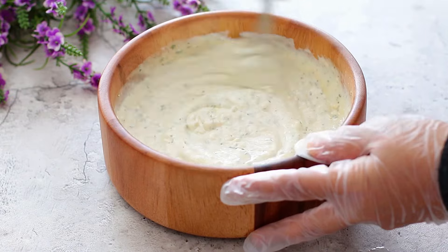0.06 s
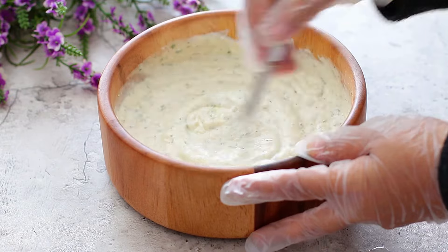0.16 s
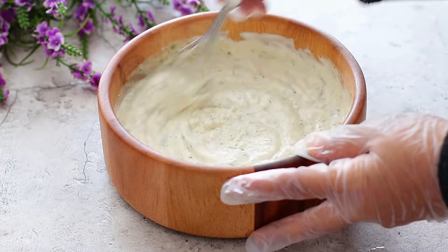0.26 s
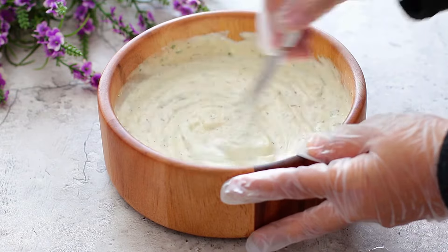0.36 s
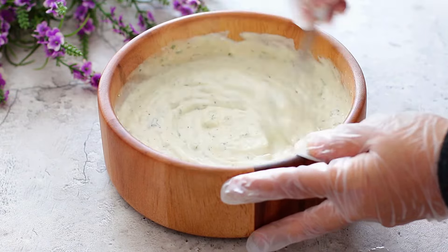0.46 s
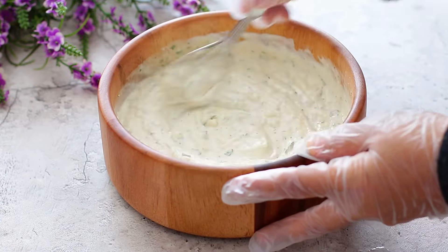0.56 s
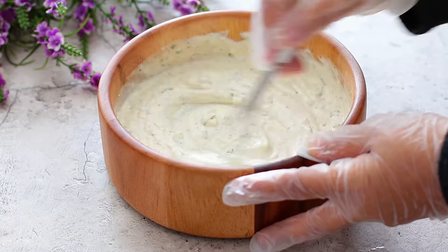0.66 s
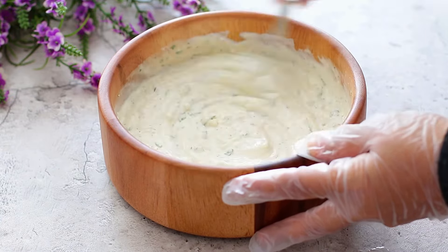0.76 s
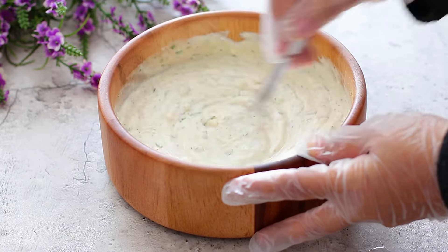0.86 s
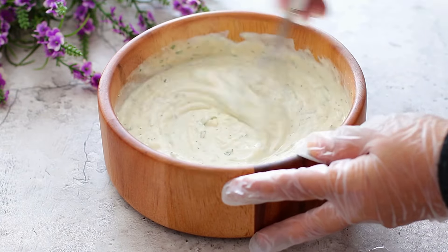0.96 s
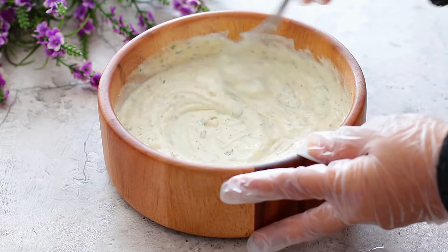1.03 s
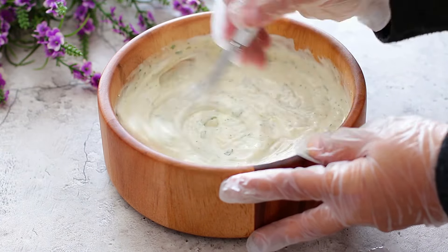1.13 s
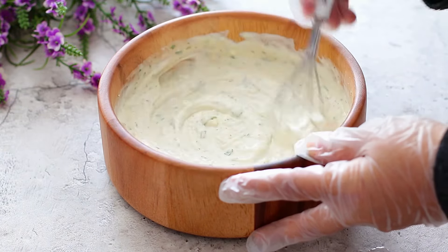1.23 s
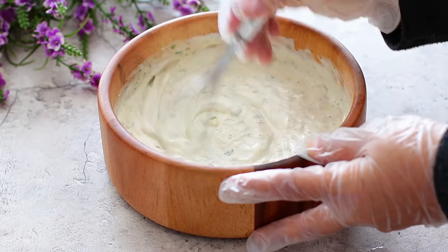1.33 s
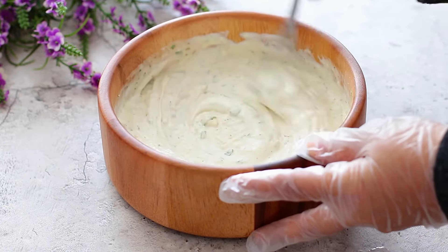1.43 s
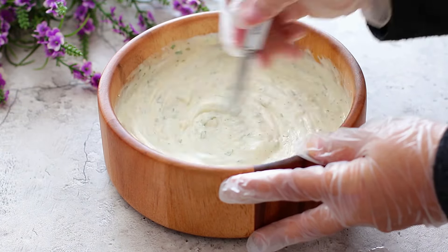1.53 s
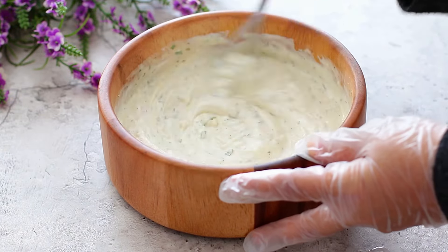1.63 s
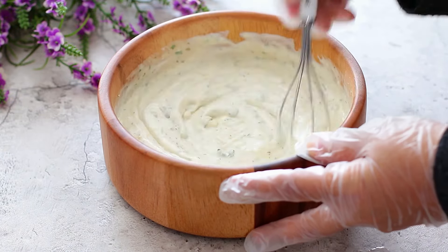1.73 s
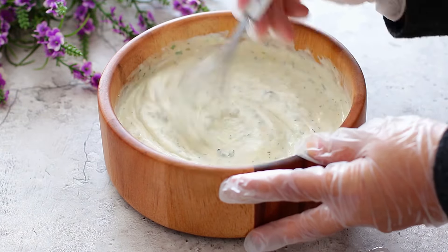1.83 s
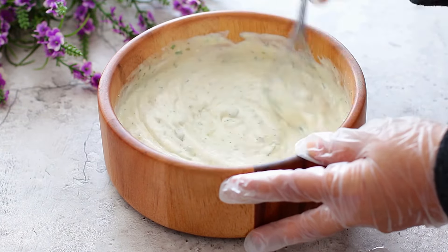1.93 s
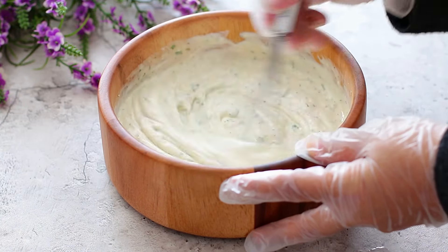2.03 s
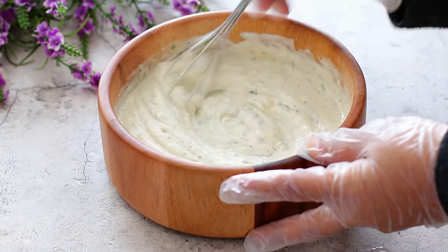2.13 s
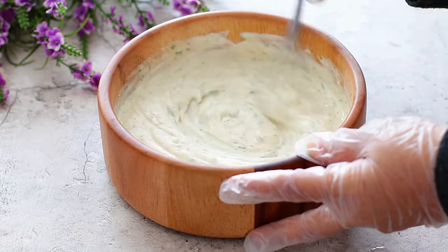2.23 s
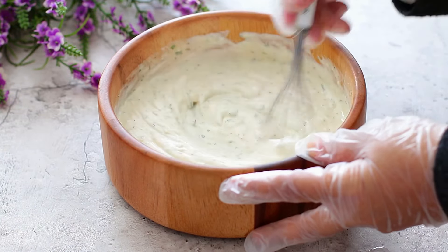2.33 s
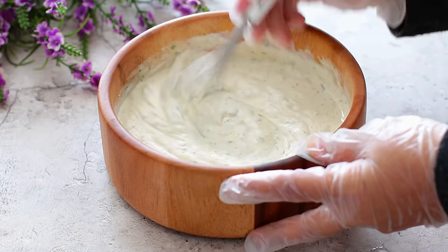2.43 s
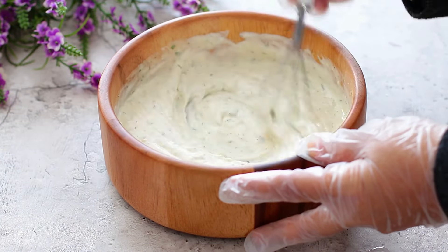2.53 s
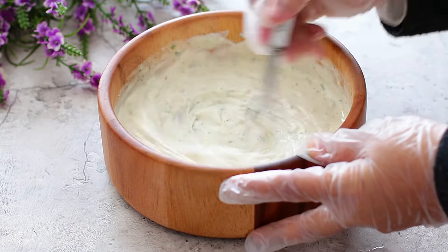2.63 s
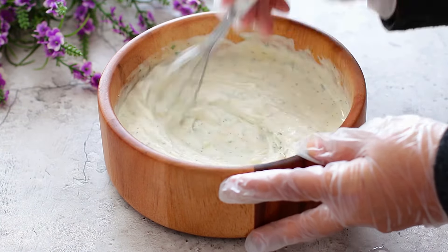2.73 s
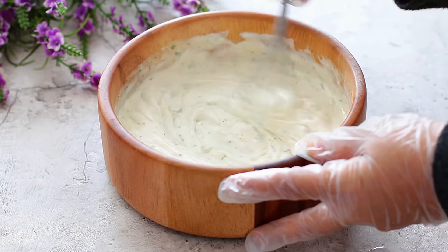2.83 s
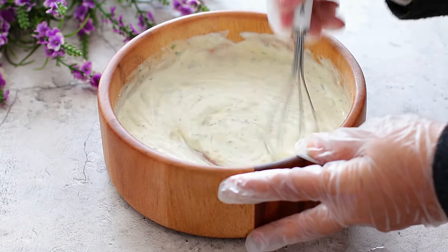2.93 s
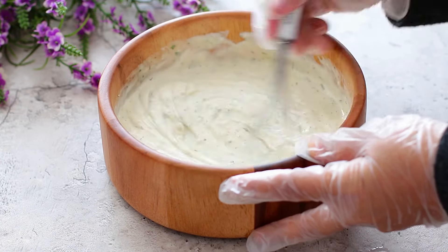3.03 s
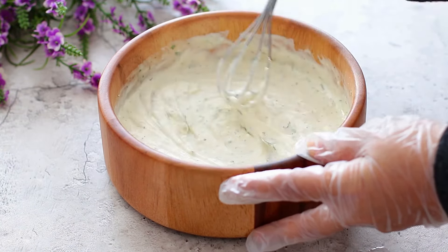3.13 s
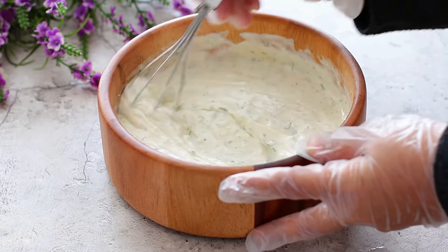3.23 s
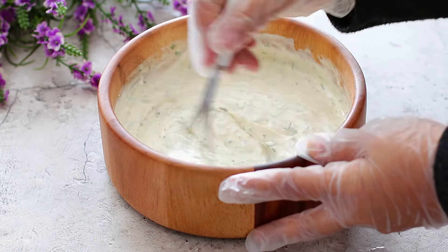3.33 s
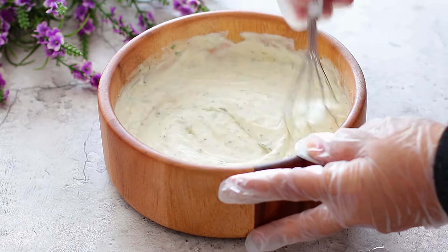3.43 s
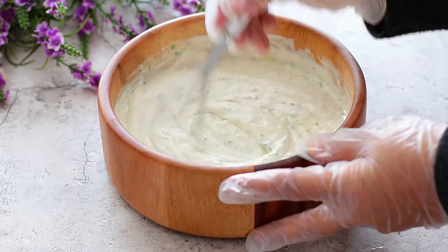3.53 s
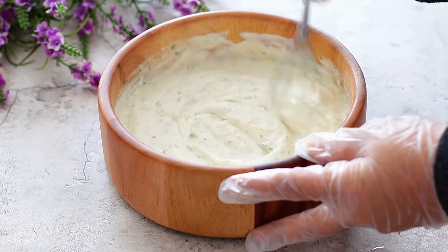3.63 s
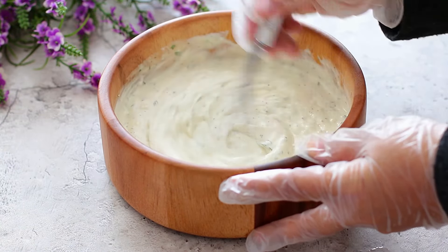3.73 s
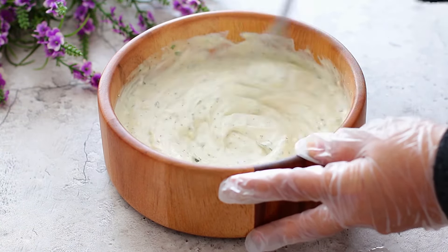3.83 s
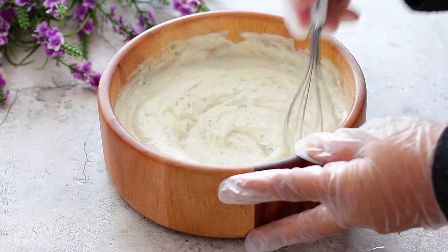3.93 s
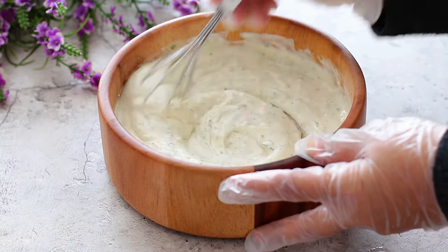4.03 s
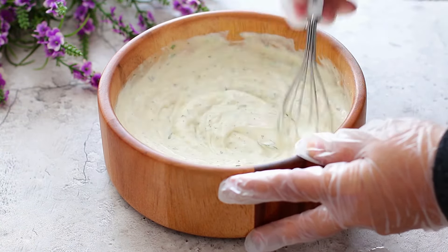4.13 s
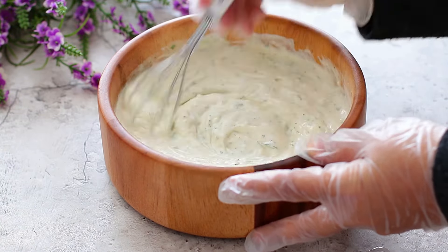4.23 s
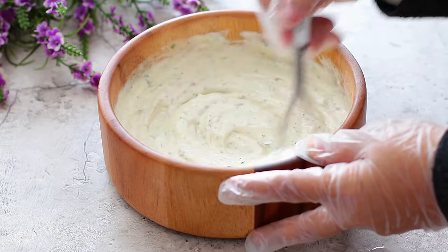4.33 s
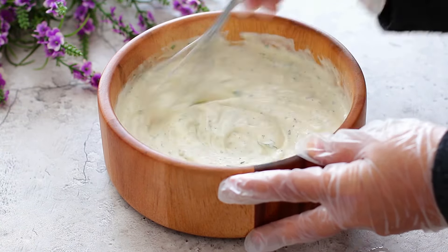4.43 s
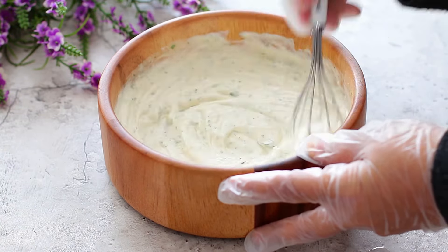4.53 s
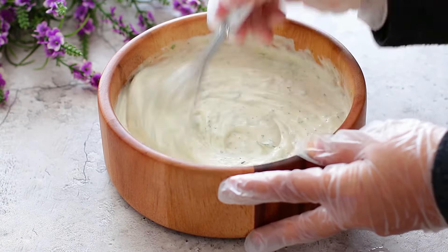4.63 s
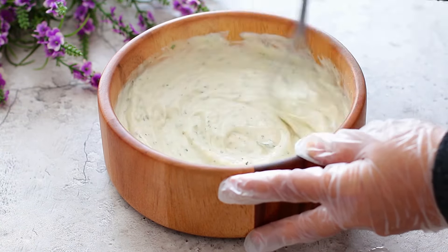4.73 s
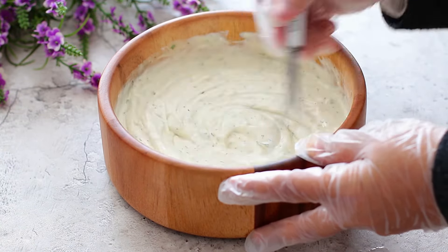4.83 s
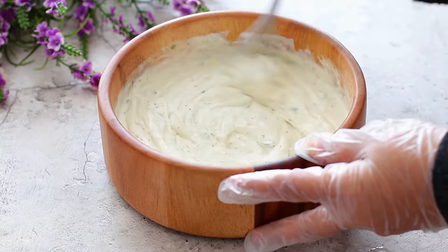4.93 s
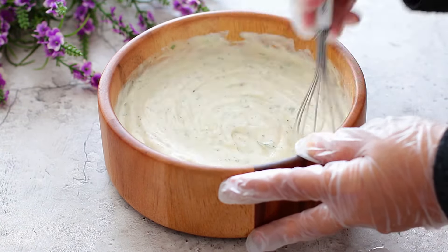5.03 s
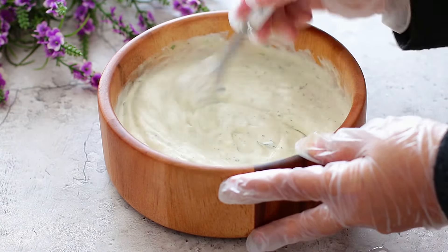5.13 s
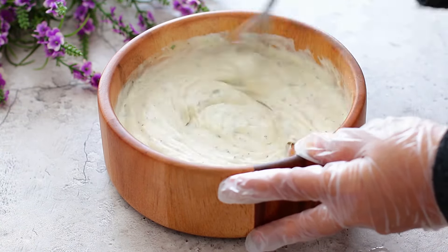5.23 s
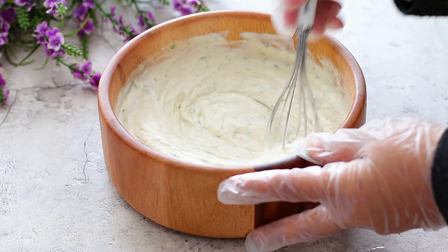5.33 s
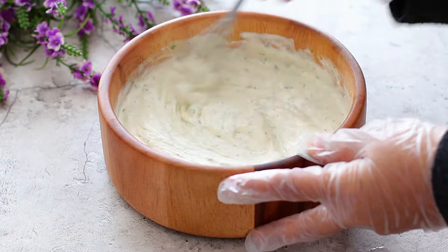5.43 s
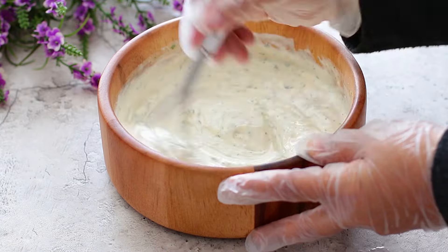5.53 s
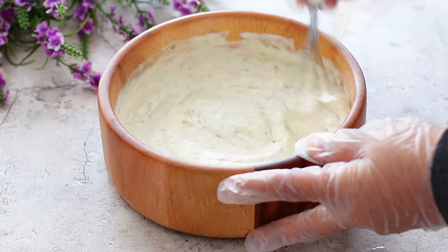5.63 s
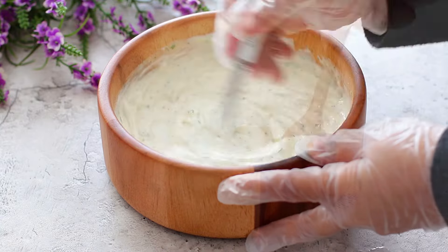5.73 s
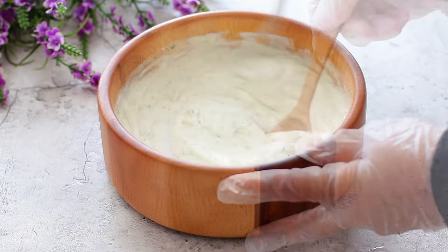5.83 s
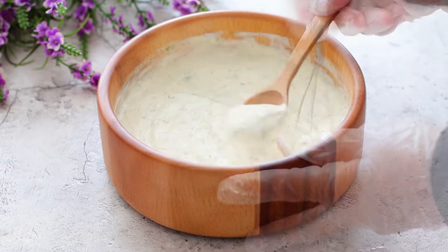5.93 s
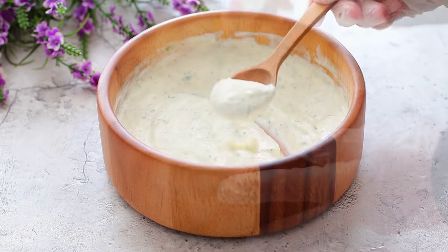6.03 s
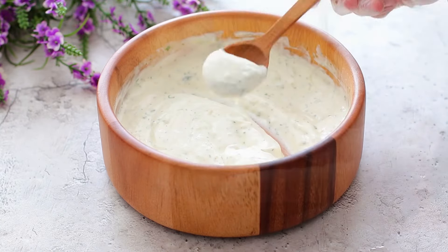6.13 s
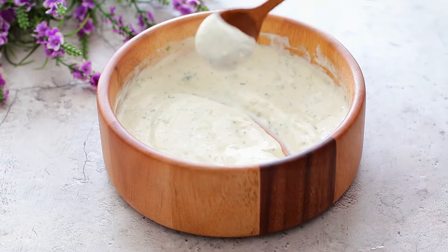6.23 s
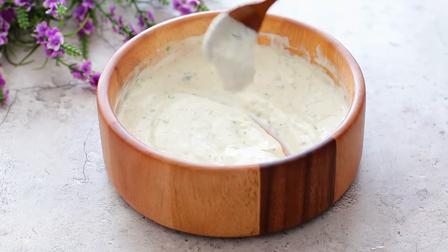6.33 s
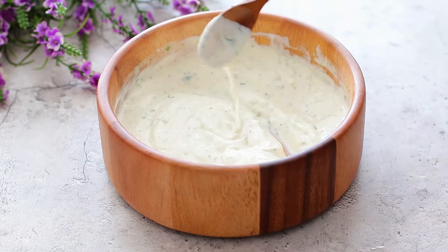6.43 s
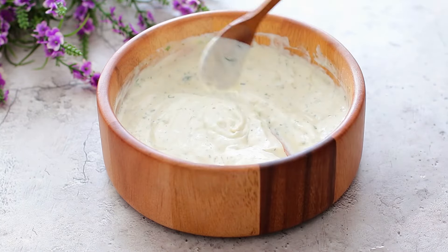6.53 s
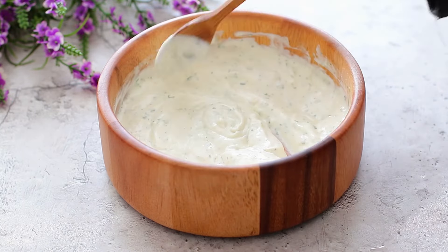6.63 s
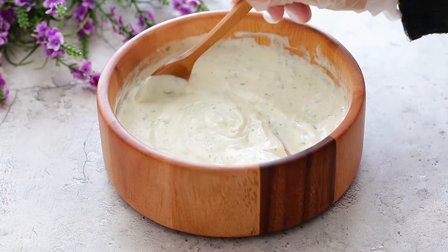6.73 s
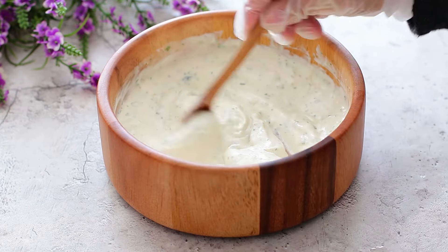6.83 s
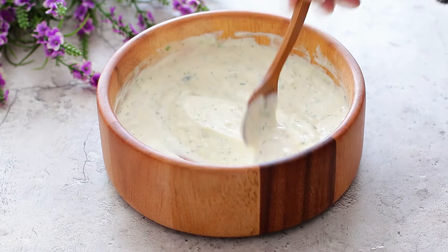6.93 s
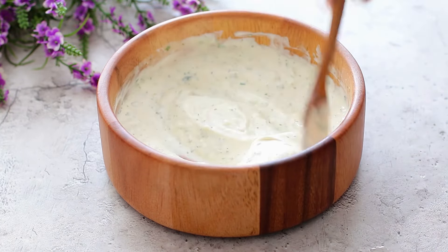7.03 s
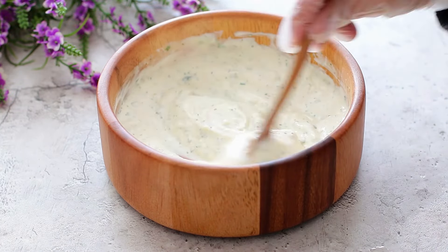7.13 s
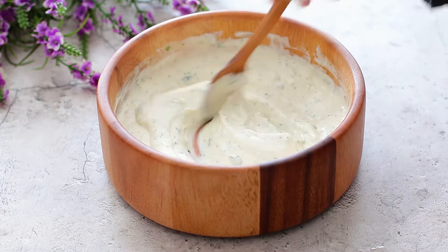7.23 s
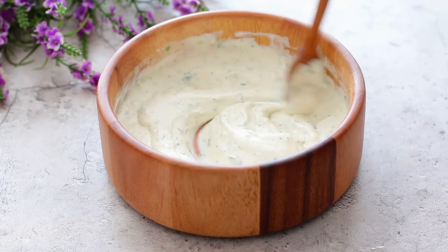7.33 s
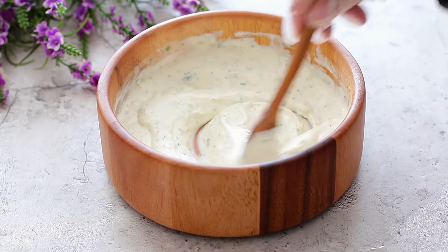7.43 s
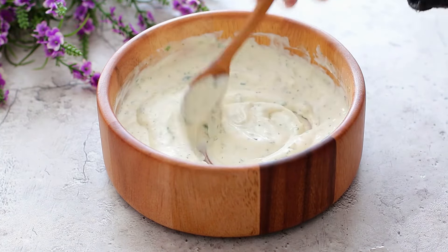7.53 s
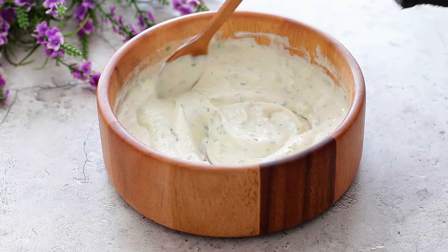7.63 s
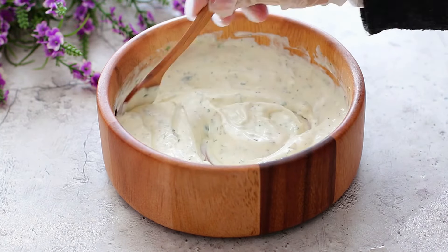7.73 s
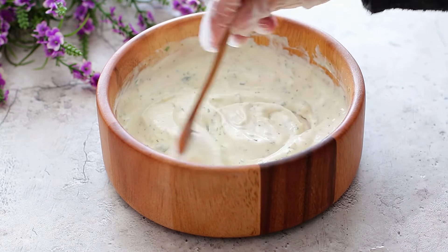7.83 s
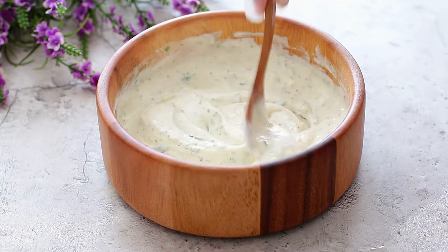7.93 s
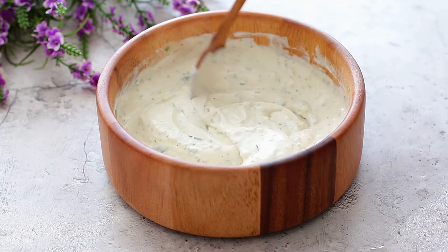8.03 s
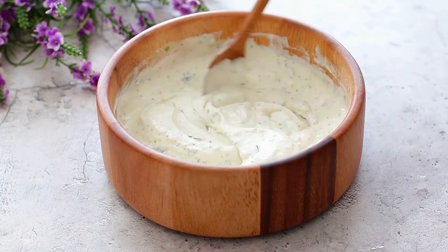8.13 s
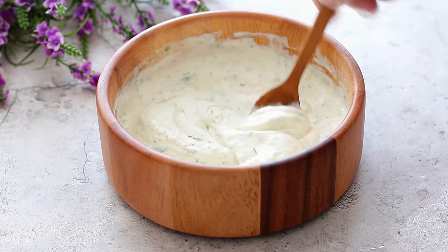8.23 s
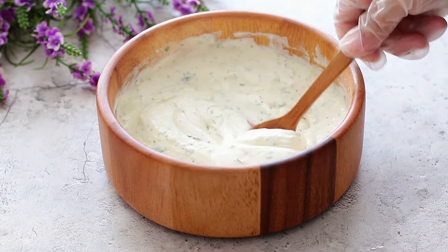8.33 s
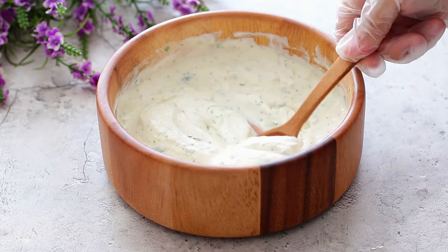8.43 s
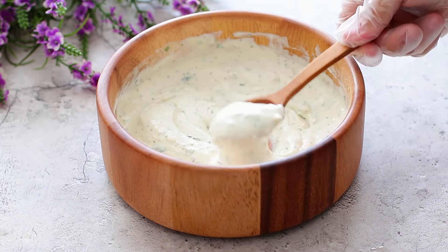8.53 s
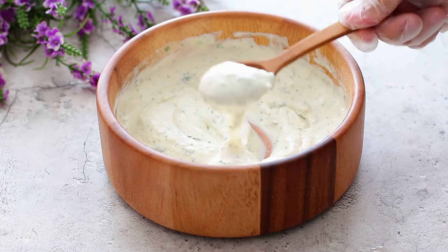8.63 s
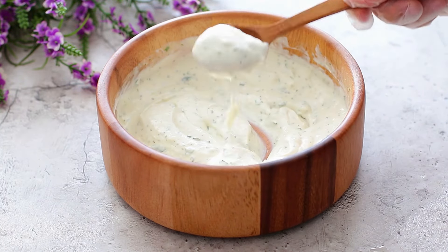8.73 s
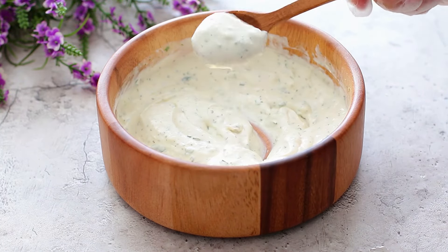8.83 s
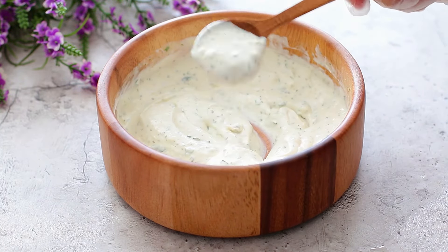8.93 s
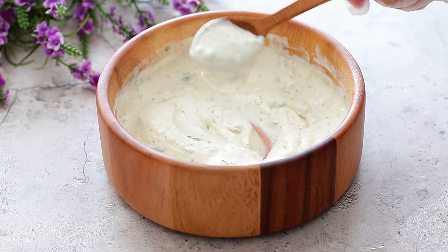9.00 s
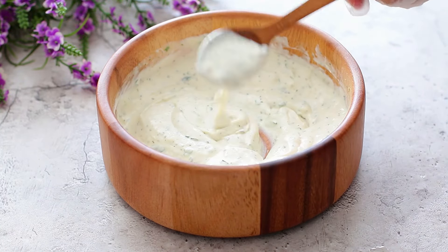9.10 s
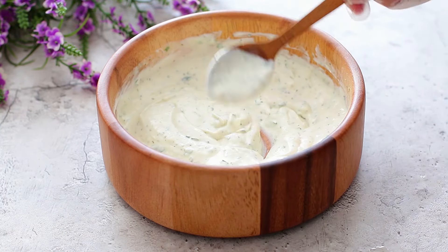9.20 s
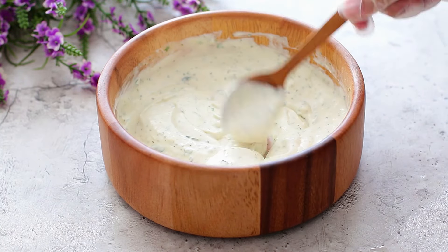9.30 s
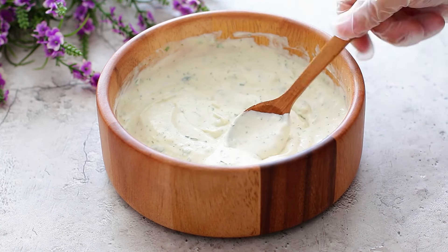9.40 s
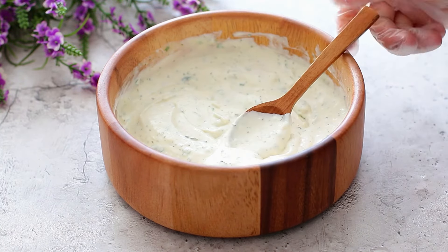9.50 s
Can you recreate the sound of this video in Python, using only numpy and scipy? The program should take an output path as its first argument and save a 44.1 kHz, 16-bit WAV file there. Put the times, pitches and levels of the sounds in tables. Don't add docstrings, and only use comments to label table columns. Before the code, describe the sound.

Close stereo pickup of a wire whisk beating thick sauce in a wooden bowl. Rhythmic bright rasps, about six a second, ride over a light drag on the bottom, with soft sauce slaps and sharp wire taps. After six seconds it stops; a wooden spoon knocks, skids and rubs sparsely, with faint drips at the end. Quiet kitchen air and a low appliance hum lie behind.

```python
import sys
import numpy as np
from scipy import signal
from scipy.fft import rfft, irfft, next_fast_len
from scipy.io import wavfile
from scipy.ndimage import uniform_filter1d

SR = 44100
rng = np.random.default_rng(int(sys.argv[2]) if len(sys.argv) > 2 else 0)


def invert_db(x):
    u = np.asarray(x, float) / 20
    return 10 ** u


def dump_mix(stems):
    frames = np.atleast_2d(stems).T
    limited = np.clip(frames, -1, 1)
    pcm = np.round(limited * 32767).astype(np.int16)
    wavfile.write(sys.argv[1], SR, pcm)


N = 421596

# peak_s, peak_db, rise_ms, fall_ms, low_wall_db
BEATS = [(.437, -41.5, 9.7, 25, -4.5), (.6, -37, 16, 11, -2.5), (0.751, -37, 4, 30, 1),
         (.954, -40.5, 17, 13, -2), (1.017, -39, 6.3, 7.9, -4.5), (1.19, -44.5, 35, 20, 5),
         (1.391, -39.5, 37, 28, -1.5), (1.59, -35, 35, 14.6, -0.5), (1.757, -32, 19.3, 20.7, -1.5),
         (1.923, -30.5, 15.6, 14.3, -1.5), (2.081, -31.5, 21, 16, -0.5), (2.228, -29.5, 18.5, 16.5, -1.5),
         (2.376, -31.5, 15, 17, 0.5), (2.52, -32, 21, 15, 1.5), (2.677, -29, 15, 15, -3),
         (2.8, -36.5, 6.5, 10, 5), (2.821, -27.5, 14.7, 7.8, -2), (2.961, -26.5, 12.7, 12.8, -7),
         (3.091, -29.5, 15.5, 13.3, 1), (3.598, -37.5, 11, 44, -3), (3.787, -33.5, 20, 23, -1),
         (3.942, -32.5, 15, 32, -3), (4.712, -35.5, 24, 27, -2), (4.882, -30, 11.4, 16.7, 0.5),
         (5.048, -34, 21, 23.4, -0.5), (5.205, -29, 13.8, 20.3, -2), (5.36, -32.5, 19, 12.7, 0),
         (5.797, -40, 33, 21, -3), (5.955, -36, 12.4, 20, -3.5), (6.128, -46.5, 24, 25, -5)]
# peak_s, peak_db, rise_and_fall_ms, main_ring_hz
BRUSHES = [(.095, -42.5, 15, 3100), (0.271, -46, 16, 4100), (0.307, -45.5, 11, 4100),
           (.368, -39, 4.8, 4230), (0.523, -41, 7.9, 4260), (0.679, -40, 16, 4100), (.878, -50, 22, 4140),
           (1.15, -42.5, 7.6, 4000), (1.27, -55, 20, 4640), (1.64, -55, 10, 4500), (2.61, -47, 7.6, 2800),
           (2.919, -41, 7.6, 4100), (3.478, -41.5, 6.8, 4580), (4.188, -46.5, 13, 3200),
           (4.239, -47, 4.9, 4560), (4.384, -41.5, 16.5, 3360), (4.458, -41.5, 4.7, 2950),
           (4.52, -48.5, 34, 3900), (4.587, -44, 9, 4510), (4.643, -41, 4.56, 2830),
           (4.818, -50, 10.3, 4200), (5.144, -41, 4.9, 2780), (5.611, -41, 8.6, 3970),
           (5.666, -44.5, 6, 2890), (5.896, -45.5, 9.3, 2880), (6.165, -49, 7.4, 3760),
           (6.255, -48.5, 10, 1710), (6.306, -56.5, 26, 3840)]
# peak_s, peak_db, rise_ms, fall_ms, main_ring_hz
PRESSES = [(.15, -46, 4.3, 7.6, 1500), (1.546, -58, 25, 25, 2300), (3.282, -41.5, 8.8, 5.2, 1540),
           (3.355, -35, 22.4, 21, 1590), (3.38, -39.5, 37, 17, 3340), (3.391, -36, 42, 11, 4740),
           (4.086, -37.5, 9.1, 11.7, 1600), (4.291, -33, 5.2, 9.9, 1630), (4.766, -43, 8.1, 4.4, 2800),
           (5.531, -47, 28, 47, 1600), (5.761, -43.5, 16, 8.7, 2300)]
# pitch_hz, width_hz, level_db
WALL = [(593, 145, -18), (882, 78, -12), (2930, 820, -15.5), (5745, 440, -2), (6580, 1700, -6.5),
        (8370, 580, -2.5), (9070, 540, -6.5), (12280, 3100, -9)]
# pitch_hz, width_hz, level_db
WALL_LOW = [(1526, 216, -3), (1939, 220, 0.5)]
# pitch_hz, width_hz, level_db
BOTTOM = [(1050, 460, -10), (1600, 190, -5), (2300, 550, 2.5), (3100, 490, 0.5), (4220, 710, 1.5),
          (5700, 830, -2.5), (7030, 1570, 3.5), (8000, 5650, 1), (9820, 1240, 3), (11500, 4200, -8.5)]
# pitch_hz, left_minus_right_db
WHISK_SIDE = [(60, 1), (130, -4.5), (290, 3.5), (640, 10), (1410, 1.5), (3100, 3.5), (6820, 2),
              (15000, 5.5)]
# time_s, level_db
EFFORT = [(0, -44), (.37, -49.5), (1.0, -54), (1.41, -46.5), (1.8, -51.5), (2.93, -47.5), (3.3, -56.5),
          (3.75, -44.5), (3.9, -48), (4.82, -45), (5.19, -48), (5.4, -50.5), (5.7, -52.5), (5.78, -49.5),
          (6.0, -53.5), (6.3, -61.5), (6.4, -72), (6.5, -89)]
# start_s, length_s
LIFTS = [
    (0.381, 0.013),
    (1.033, 0.078),
    (3.147, 0.12),
    (5.45, 0.019),
]
# start_s, peak_db, rattle_s, left_minus_right_db, thud_db
TAPS = [(0.142, -30, 0.021, -0.5, -79), (0.187, -36, 0.0061, -4, -65), (0.406, -31, 0.0025, 2, -36),
        (0.896, -32, 0.0048, 0, -62), (1.114, -36.5, 0.0059, -1, -44), (1.132, -31, 0.0073, -4, -64.5),
        (1.33, -34, .004, 2, -60), (1.512, -27.5, 0.0097, -0.5, -55), (1.898, -39, 0.011, 3.5, -65),
        (2.02, -28, 0.011, 0, -49), (2.315, -36, .004, 2, -62), (2.463, -14.5, 0.0074, 0.5, -52),
        (3.063, -24, 0.002, -4, -52), (3.241, -22, 0.0036, 2, -38), (3.2727, -17, 0.003, -6.5, -44),
        (3.321, -23, 0.0031, -4, -54.5), (3.906, -31, 0.0016, -16, -64), (4.047, -23.5, 0.0075, -6.5, -42),
        (4.2662, -17, 0.0077, -5.5, -59.5), (4.536, -40, .004, 2, -55), (5.293, -22.5, 0.011, -1, -53),
        (5.5014, -17, 0.0056, -3.5, -41), (5.61, -26.5, 0.0098, 2, -48), (5.737, -28.5, 0.008, 0, -66),
        (5.77, -34, 0.0048, 0, -50), (6.143, -30.5, 0.0047, 2, -66), (6.188, -39, 0.005, 5, -70),
        (6.225, -46, 0.0056, -4, -68)]
# peak_s, peak_db
SLAPS = [(.08, -78), (.23, -57), (0.408, -48.5), (.56, -53), (0.702, -51), (0.901, -53), (1.01, -57),
         (1.117, -51.5), (1.36, -61), (1.59, -67), (1.77, -64), (3.29, -55), (4.09, -69), (5.7, -59.5),
         (6.141, -69)]
# pitch_hz, width_hz, level_db
SLOSH = [(115.7, 6.4, -2.0), (179.0, 19.3, 5.0), (285.4, 41, -3), (428, 185, 1.5), (623, 120, -10.0), (854, 65, 0)]
# start_s, peak_db
BUMPS = [
    (3.268, -56),
    (3.312, -48.5),
    (5.544, -53),
]
# start_s, spot, peak_db, table_thump_db
KNOCKS = [(6.7506, "sauce", -43, -55), (7.152, "sauce", -48, -59), (7.261, "wall", -35.5, -64),
          (7.7246, "bottom", -23.5, -50), (7.89, "wall", -50, -62), (8.129, "wall", -19.5, -50),
          (8.168, "wall", -40, -70), (8.437, "bubble", -55, -73), (9.139, "drip", -48, -75),
          (9.322, "bubble", -52, -80), (9.509, "rim", -34, -61), (9.5173, "rim", -37.5, -70)]
SPOTS = {"sauce": [(600, 185, 3.5), (1080, 180, -4)], "bottom": [(594, 97, -2), (1030, 470, -4.5),
         (1600, 370, -3.5), (2480, 180, -4.5), (3970, 740, -15)], "wall": [(600, 340, -19.5),
         (1120, 230, -1.5), (1890, 340, -3.5), (2800, 400, -8), (5340, 1060, -12.5)],
         "rim": [(617, 38, -6.5), (1248, 49, 3), (1780, 440, -11), (3530, 490, -11.5), (5360, 810, -20)],
         "drip": [(1120, 76, 2), (1840, 360, -9), (3500, 980, -8)], "bubble": [(2600, 450, 3),
         (5200, 1100, 6)]}
# start_s, level_db, hold_s, release_db_per_s, flat_low_db
SKIDS = [
    (7.257, -52.5, 0.22, 293, 0),
    (7.731, -48.5, 0.0071, 295, 12),
    (7.886, -44.5, .012, 403, -1),
    (8.128, -49, 0.0053, 423, -3),
]
# start_s, level_db, hold_s, release_db_per_s, flat_low_db
RUBS = [
    (6.835, -44, .057, 795, -24),
    (7.483, -47, .03, 910, -23),
    (7.895, -49.5, 0.023, 600, 5),
    (8.18, -50, .011, 155, 3),
    (9.49, -55, 0.012, 230, 22),
]
# start_s, length_s, level_db, from_hz, to_hz
SINGS = [(7.262, .1, -53, 1650, 1430), (7.261, 0.24, -52, 1235, 1060), (7.292, .07, -57, 850, 800),
         (7.38, 0.15, -58.5, 654, 480), (7.501, 0.091, -52, 1820, 1800), (7.505, 0.057, -61, 1120, 1100),
         (7.89, 0.055, -51, 1130, 1080), (7.901, 0.065, -49, 1700, 1630), (8.128, .05, -54, 2800, 2600),
         (8.13, 0.056, -53, 2050, 1950), (8.162, 0.041, -46, 910, 800), (8.194, 0.16, -53, 1110, 1150),
         (8.2, .04, -61, 1900, 1850), (8.2, .04, -58, 5200, 5000), (8.213, .07, -63, 4000, 4100),
         (8.27, .06, -64, 3700, 3500), (7.495, 0.052, -47, 3000, 3100), (7.512, 0.034, -44.5, 4200, 4300),
         (7.258, .05, -53, 3000, 2920), (6.86, 0.067, -52, 1600, 1700)]
# pitch_hz, width_hz, level_db
BOWL = [(136, 41, -7.5), (329, 190, 0), (632, 130, -2.5), (790, 490, -14.5), (1133, 310, -0.5),
        (1820, 360, -9.5), (2500, 280, -10), (3000, 1170, -5.5), (4290, 740, -8.5), (5620, 1500, -8),
        (9300, 2300, -26.5)]
# pitch_hz, left_minus_right_db
SPOON_SIDE = [(60, 0.0), (150, -4), (380, 12), (950, 2.5), (2380, -1.5), (5980, 5), (15000, 3)]
# pitch_hz, t60_s
ROOM = [(100, 0.35), (1000, 0.38), (4000, 0.28), (12000, 0.18)]
# pitch_hz, density_db
AIR = [(12, -21), (20, -4.5), (96, -8), (146, -5), (574, -10), (642, -15), (976, -10), (1120, -18.5),
       (1220, -13.5), (12400, -19), (16000, -16)]
# pitch_hz, correlation
AIR_SAME = [(60, 0.14), (240, 0.13), (950, -0.38), (3770, 0.027), (15000, -0.096)]
# multiple, level_db
HUM = [(1, -100.5), (2, -78), (3, -80.5), (4, -84.5), (5, -85.5), (7, -86), (8, -100), (9, -82.5),
       (10, -88), (11, -95), (12, -80.5), (16, -89)]

BEAT_HZ, LOW_LEAD_MS = 3980, 3.1
BRUSH_LOW_DB, PRESS_LOW_DB = -6, -1.5
DRAG_S = 7
LIFT_DB, LIFT_S, LAND_S = -21.5, 0.05, 0.0019
SWELL_DB, SWELL_S, SWELL_LAG_S = 3, 0.052, 0.023
SLAP_RISE_S, SLAP_FALL_S = 0.021, 0.024
ROCK_DB, ROCK_FROM_S = -15.5, 1.25
SKID_RISE_S, RUB_RISE_S = 0.0046, 0.027
SAG_DB_PER_S, TRAIL_DB, TRAIL_DB_PER_S = 34, -25.5, 66
FLAT_S, BRIGHTEN_S = 0.19, 0.061
EDGE_LOW_DB, EDGE_TREBLE_DB, FLAT_TREBLE_DB = -12.5, -9, 2.5
SING_WIDTH_HZ, SING_FADE_DB = 180, -14.5
AIR_DB, HUM_HZ, ROOM_DB = -63, 70.6, -11.5


def evened(x):
    return x / np.sqrt(np.mean(x ** 2) + 1e-20)


def read(points, hz):
    f, value = np.transpose(points)
    return np.interp(np.log(hz + 1), np.log(f + 1), value)


def add(mix, s, sound):
    part = mix[:, max(round(s * SR), 0):][:, :sound.shape[1]]
    part += sound[:, :part.shape[1]]


def lumps(size, width_s):
    knots = rng.standard_normal(int(size / SR / width_s) + 4)
    return evened(np.interp(np.arange(size) / SR / width_s, np.arange(len(knots)), knots))


def grit(size, slips_per_s, spread_db, smooth, alike):
    sizes = invert_db(spread_db * np.minimum(rng.exponential(1, size), 2.5))
    slips = sizes * (rng.random(size) < slips_per_s / SR)
    both, *own = rng.standard_normal((3, size)) * (evened(slips) + smooth)
    alike = np.clip(alike, 0, 1)
    return evened(alike * both + np.sqrt(1 - alike ** 2) * np.array(own))


def ring(x, modes, side, scatter_db, valley_db=-22, order=1):
    size = next_fast_len(x.shape[1] + 1500)
    hz = np.fft.rfftfreq(size, 1 / SR)
    f, width, db = np.transpose(modes)[..., None]
    poles = 1 / (1 + 2j * (hz - f) / (width * np.sqrt(order))) ** order
    shared, own = rng.standard_normal(len(f)), rng.standard_normal((2, len(f)))
    strength = invert_db(db.T + scatter_db * (shared + own))
    phase = np.tanh(f.T / 450) * rng.uniform(-1.2, 1.2, (2, len(f)))
    signs = (-1) ** np.arange(len(f))
    body = (strength * np.exp(1j * phase) * signs) @ poles + invert_db(valley_db)
    body *= invert_db(np.outer([.5, -.5], read(side, hz)))
    body *= 1j * hz / (250 + 1j * hz)
    body /= (1 + 1j * hz / 12000) ** 2
    return evened(irfft(rfft(x, size) * body, size)[:, :x.shape[1]])


def shifting(x, patchy_db, ears_db):
    z = signal.stft(x, nperseg=256, noverlap=128)[2]
    field = rng.standard_normal((3,) + z.shape[1:])
    for axis, size in ((1, 3), (1, 2), (2, 8), (2, 4)):
        field = uniform_filter1d(field, size, axis)
    field = evened(field)
    z = z * invert_db(patchy_db * field[0] + ears_db * field[1:])
    patched = signal.istft(z, nperseg=256, noverlap=128)[1][:, :x.shape[1]]
    return patched * np.std(x) / np.std(patched)


def stroke(s, peak_db, rise_ms, fall_ms, low_db, main_hz):
    lead_in_s = 0.11
    ms = np.arange(-110, 130, 1000 / SR)
    rub = grit(len(ms), 3500, 3.5, 1.4, 0.46)
    place = 1 + .014 * rng.standard_normal()
    high = [(main_hz, 420, 1.5), (main_hz * 0.8785, 300, -4)] + WALL
    rasp = 0
    for modes, lead_ms, db in ((WALL_LOW, LOW_LEAD_MS, low_db - 6), (high, 0, 0)):
        late_ms = ms + lead_ms
        pressure_db = -6.5 * np.where(ms < -lead_ms, -late_ms / rise_ms, late_ms / fall_ms) ** 1.54
        placed = np.multiply(modes, [place, 1, 1])
        rasp = rasp + ring(rub, placed, WHISK_SIDE, 0.8, valley_db=-36, order=2) * invert_db(db + pressure_db)
    start = max(round((lead_in_s - s) * SR), 0)
    rasp = rasp * invert_db(peak_db + 1.6 * lumps(len(ms), 0.00611))
    return s - lead_in_s, rasp[:, start:]


def contact():
    t = np.arange(0, N / SR + .01, .001)
    away = 0
    for s, length in LIFTS:
        corners = np.cumsum([s - LIFT_S / 2, LIFT_S, max(length - LIFT_S / 2, 0), LAND_S])
        away = away + np.interp(t, corners, [0, 1, 1, 0])
    return t, np.interp(t, *np.transpose(EFFORT)), LIFT_DB * away


def drag():
    rub = grit(DRAG_S * SR, 2500, 4.0, 1.4, .7)
    rasp = shifting(ring(rub, BOTTOM, WHISK_SIDE, 0.16, valley_db=-16.5, order=2), 4.57, 3.3)
    t, level_db, lift_db = contact()
    beat_s = np.array(BEATS)[:, :1]
    near = np.exp(-((t - beat_s - SWELL_LAG_S) / SWELL_S) ** 2).max(0)
    drag_db = np.interp(np.arange(N) / SR, t, level_db + lift_db + SWELL_DB * (near - .5))
    return np.pad(rasp, ((0, 0), (0, N - DRAG_S * SR))) * invert_db(drag_db + 3.1 * lumps(N, .017))


def tap(s, peak_db, rattle_s, pan_db, thud_db):
    t = np.arange(0, .06, 1 / SR)
    wires = ring(grit(len(t), 3000, 2.2, 0.12, 0.89), BOTTOM, WHISK_SIDE, 1.2, valley_db=-30)
    shape = np.minimum(t / 0.0016, 1) * (invert_db(-9 * (t / rattle_s) ** 2) + invert_db(-21.5 - 300 * t))
    thud = ring(grit(len(t), 950, 2.0, 2.3, 0.7), BOWL[:3], WHISK_SIDE, 2.0, valley_db=-47)
    thud = thud * invert_db(thud_db - 3.0 - 1130 * t) * np.minimum(t / 0.011, 1)
    return s, wires * shape * invert_db(peak_db - 9.0 + np.outer([.5, -.5], pan_db)) + thud


def slosh():
    size = DRAG_S * SR
    rumble = grit(size, 300, 2.4, 0.97, 0.83)
    low = 0
    for hz, width_hz, db in SLOSH:
        mode = ring(rumble, [(hz, width_hz, db)], WHISK_SIDE, 0.33, -39.5, order=2)
        wander_db = 3.3 * np.tanh(hz / 500) * lumps(size, 0.036)
        low = low + mode * invert_db(db + wander_db) * np.sqrt(width_hz)
    t, level_db, lift_db = contact()
    s, peak_db = np.transpose(SLAPS)[..., None]
    slaps = invert_db(peak_db) * np.exp(-((t - s) / np.where(t < s, SLAP_RISE_S, SLAP_FALL_S)) ** 2)
    rocking = invert_db(level_db + ROCK_DB - 1.8 * (t < ROCK_FROM_S))
    push = (slaps.sum(0) + rocking) * invert_db(lift_db)
    low = evened(low) * np.interp(np.arange(size) / SR, t, push)
    return np.pad(low, ((0, 0), (0, N - size)))


def bump(s, peak_db):
    t = np.arange(0, .1, 1 / SR)
    boom = np.sin(2 * np.pi * 185 * t) + 0.53 * np.sin(2 * np.pi * 125 * t)
    return s, np.tile(boom * invert_db(peak_db) * (t / 0.014) * np.exp(1 - t / 0.012), (2, 1))


def knock(s, spot, peak_db, thump_db):
    blow, t = np.zeros((2, 4000)), np.arange(4000) / SR
    blow[:, :9] = np.hanning(9)
    sound = ring(blow, SPOTS[spot], SPOON_SIDE, 0.18, valley_db=-28, order=2)
    thump = invert_db(thump_db - 400 * t) * np.sin(2 * np.pi * 95 * t)
    thump = thump * np.minimum(t / 0.0034, 1) * np.cos(np.pi / 2 * t / t[-1])
    return s, invert_db(peak_db + 3.5) * sound / abs(sound).max() + thump


def scrape(rise_s, s, peak_db, hold_s, release_db_per_s, low_db):
    t = np.arange(0, rise_s + hold_s + .25, 1 / SR)
    after = np.maximum(t - rise_s - hold_s, 0)
    shape = invert_db(-SAG_DB_PER_S * np.minimum(t, rise_s + hold_s))
    shape = shape * (invert_db(-release_db_per_s * after) + invert_db(TRAIL_DB - TRAIL_DB_PER_S * after))
    shape *= np.minimum(t / rise_s, 1) ** 2 * np.minimum((t[-1] - t) / .05, 1)
    flat = np.minimum(t / FLAT_S, 1)
    flat_low_db = EDGE_LOW_DB + (low_db - EDGE_LOW_DB) * flat
    treble_db = FLAT_TREBLE_DB + (EDGE_TREBLE_DB - FLAT_TREBLE_DB) * np.exp(-t / BRIGHTEN_S)
    rub = grit(len(t), 3000, 2.6, 1.1, .75)
    low, body, hiss = (ring(rub, part, SPOON_SIDE, 0.29, valley_db=-32.0, order=2)
                       for part in (BOWL[:3], BOWL[3:7], BOWL[6:]))
    rubbed = low * invert_db(flat_low_db) + body + hiss * invert_db(treble_db)
    return s, rubbed * shape * invert_db(peak_db + 1.3 * lumps(len(t), 0.0103))


def sing(s, length_s, level_db, from_hz, to_hz):
    t = np.arange(0, length_s, 1 / SR)
    turn = np.exp(2j * np.pi * np.cumsum(from_hz + (to_hz - from_hz) * t / length_s) / SR)
    r = np.exp(-np.pi * SING_WIDTH_HZ / SR)
    narrow = signal.lfilter([1], [1, -2 * r, r * r], grit(len(t), 600, 3.4, 0.6, 0.72) / turn)
    shape = np.minimum(np.minimum(t / .008, (length_s - t) / 0.013), 1)
    shape = shape * invert_db(SING_FADE_DB * t / length_s + 3.9 * lumps(len(t), 0.00906))
    ears_db = level_db + np.outer([.5, -.5], read(SPOON_SIDE, from_hz))
    return s, evened((turn * narrow).real) * shape * invert_db(ears_db)


def room(x):
    taps = np.zeros((2, SR // 2))
    at = np.arange(120, SR // 2 - 20, 20) + rng.integers(0, 20, (2, (SR // 2 - 121) // 20))
    np.put_along_axis(taps, at, rng.choice([-1., 1.], at.shape), 1)
    hz, t, z = signal.stft(taps, SR, nperseg=256)
    tail = signal.istft(z * invert_db(-60 * t / read(ROOM, hz)[:, None]), SR, nperseg=256)[1]
    return signal.fftconvolve(x.mean(0)[None], tail / np.linalg.norm(tail[0]), axes=1)[:, :N]


def kitchen():
    size = next_fast_len(N)
    hz = np.fft.rfftfreq(size, 1 / SR)
    a, b = rfft(rng.standard_normal((2, size)))
    same = np.clip(read(AIR_SAME, hz), -1, 1)
    ears = np.array([a, same * a + np.sqrt(1 - same ** 2) * b])
    air = evened(irfft(ears * invert_db(read(AIR, hz)), size)[:, :N]) * invert_db(AIR_DB - 2.5)
    turns = np.cumsum(HUM_HZ * (1 + 0.001465 * lumps(N, 0.2))) / SR
    for k, db in HUM:
        phase = rng.random() + 0.013 * k * rng.standard_normal((2, 1))
        level = np.sqrt(2) * invert_db(db + 1.96 * lumps(N, 0.077))
        air += level * np.sin(2 * np.pi * (k * turns + phase))
    return air


def scene():
    rubbing, blows = np.zeros((2, 2, N))
    for row in BEATS:
        add(rubbing, *stroke(*row, BEAT_HZ))
    for s, peak_db, rise_ms, hz in BRUSHES:
        add(rubbing, *stroke(s, peak_db, rise_ms, rise_ms, BRUSH_LOW_DB, hz))
    for *row, hz in PRESSES:
        add(rubbing, *stroke(*row, PRESS_LOW_DB, hz))
    for source, rows in ((tap, TAPS), (bump, BUMPS), (knock, KNOCKS), (sing, SINGS)):
        for row in rows:
            add(blows, *source(*row))
    for rise_s, rows in ((SKID_RISE_S, SKIDS), (RUB_RISE_S, RUBS)):
        for row in rows:
            add(blows, *scrape(rise_s, *row))
    bowl = blows + drag() + slosh()
    add(bowl, 0, shifting(rubbing[:, :DRAG_S * SR], 2.87, 2.93))
    return bowl + invert_db(ROOM_DB) * room(bowl) + kitchen()


def roll_off(x):
    return signal.sosfilt(signal.butter(12, 16660, fs=SR, output="sos"), x)


def record(dry):
    limited = signal.oaconvolve(dry, signal.firwin(301, 15750, fs=SR)[None], "same")
    return roll_off(limited)


dry = scene()
out = record(dry)
dump_mix(out)
```